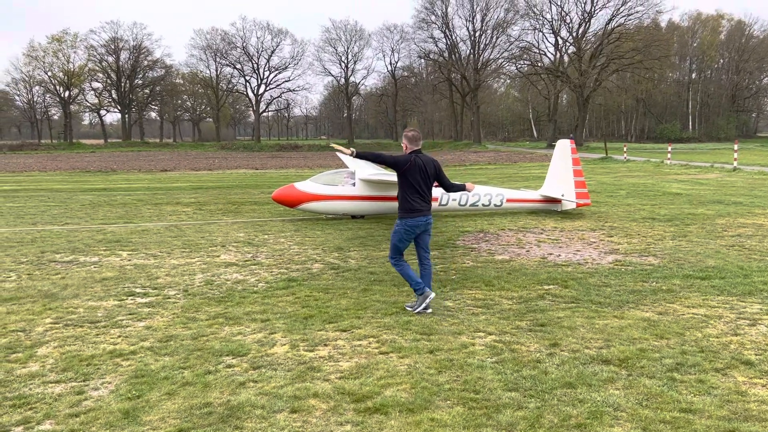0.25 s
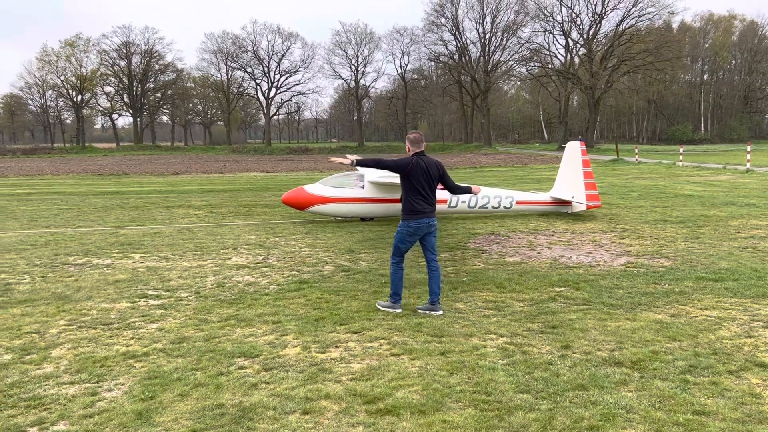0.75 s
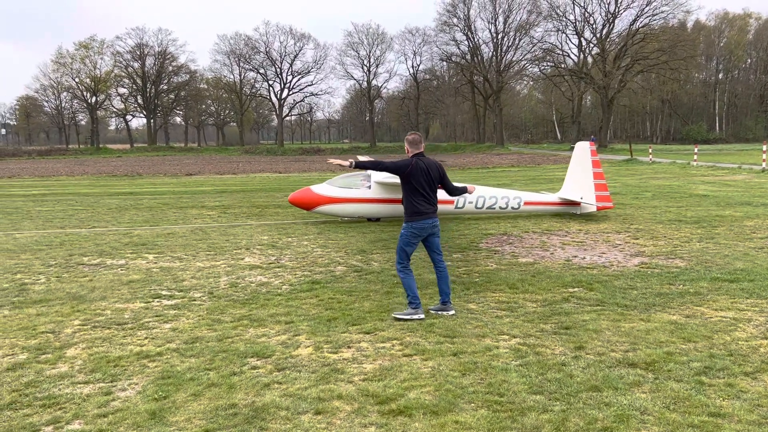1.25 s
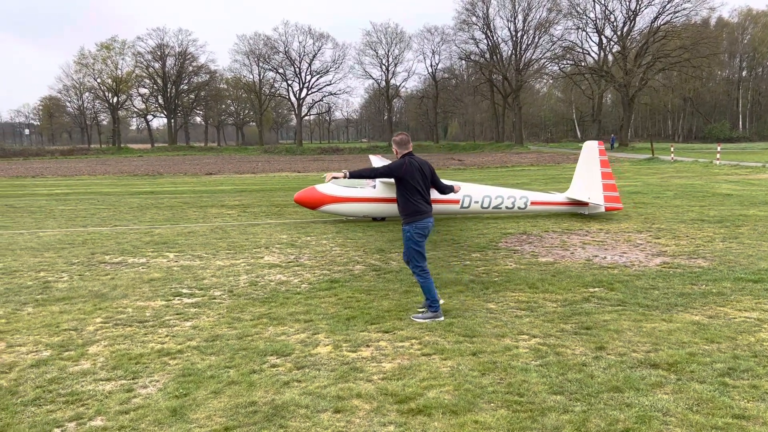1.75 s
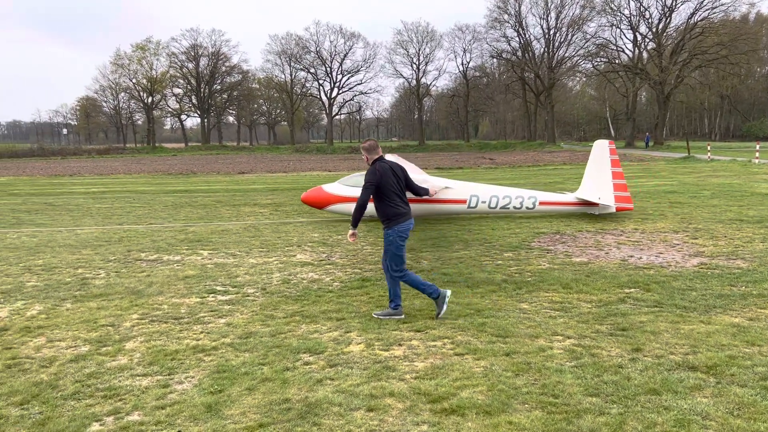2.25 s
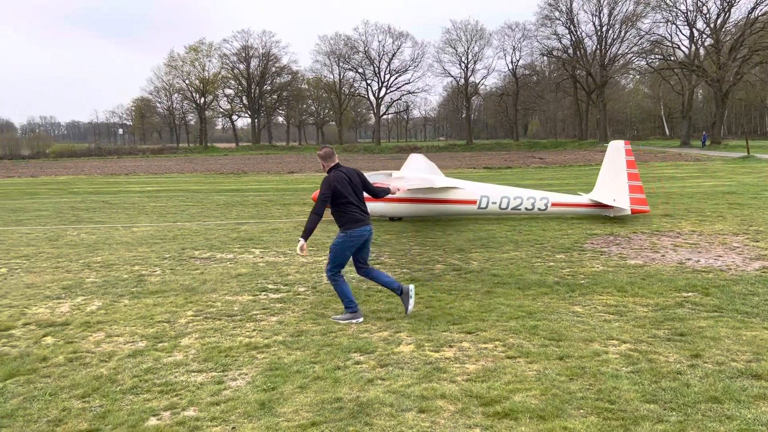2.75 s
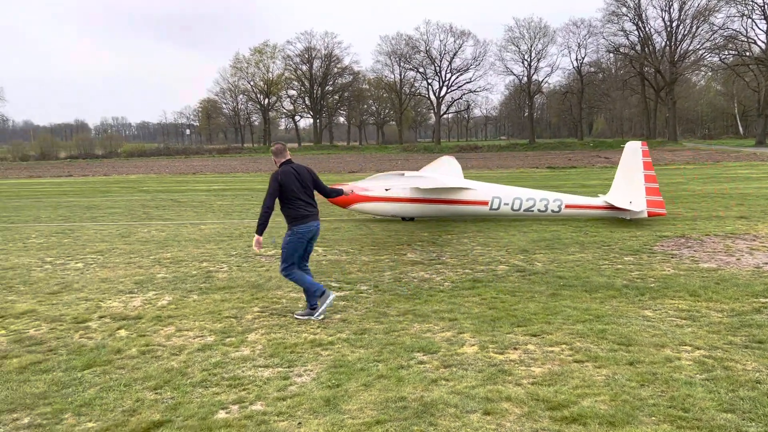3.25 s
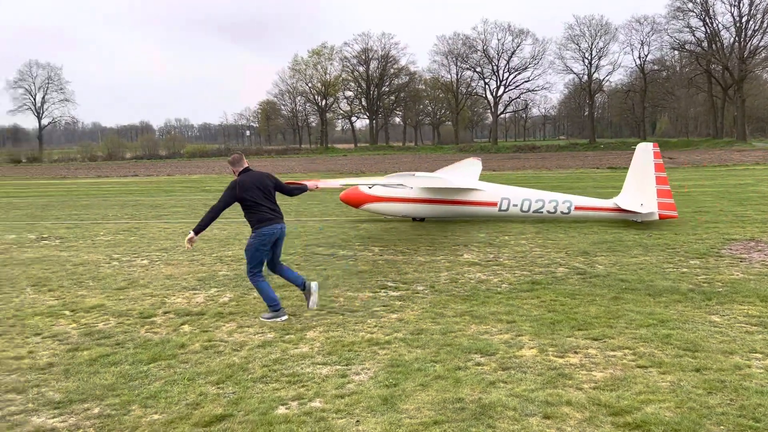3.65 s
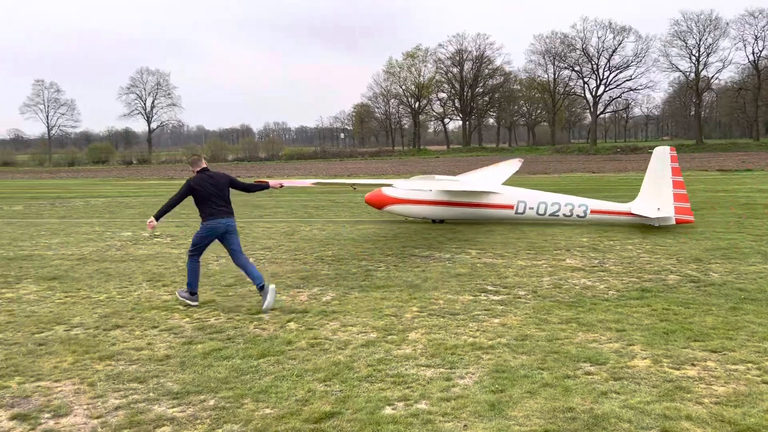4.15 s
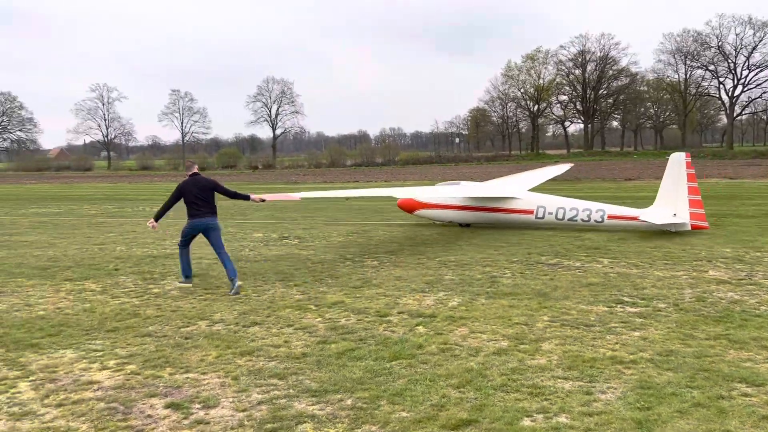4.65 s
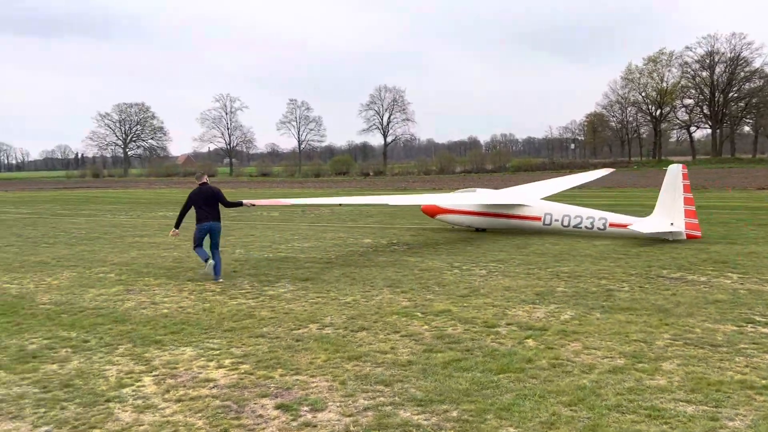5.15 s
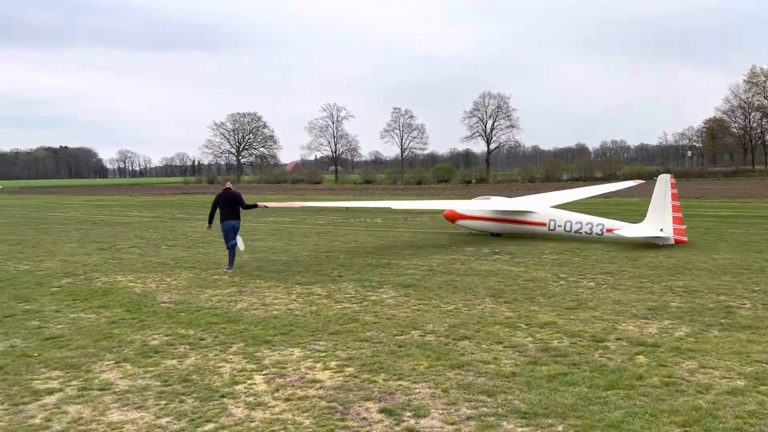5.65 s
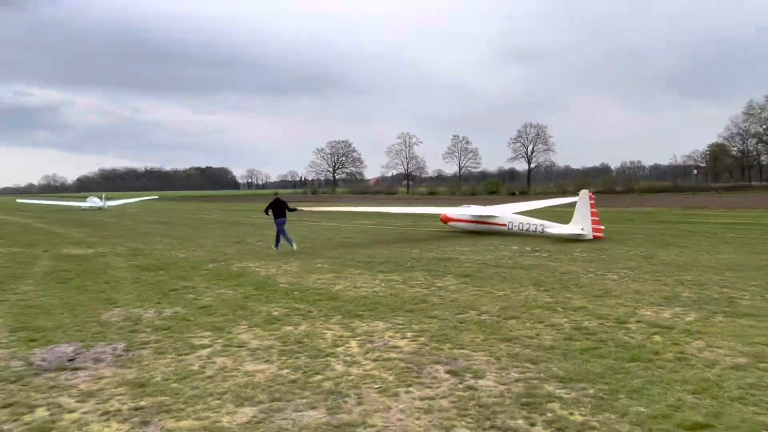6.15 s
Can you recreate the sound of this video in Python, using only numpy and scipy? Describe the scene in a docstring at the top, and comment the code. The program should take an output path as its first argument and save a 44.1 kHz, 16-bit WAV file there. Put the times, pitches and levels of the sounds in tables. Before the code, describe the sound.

A hand-held phone outdoors picks up a small propeller plane, left of centre, opening to full power. Rough separate blade beats and sharp snaps merge into a smooth low buzz with airy rasp and a geared engine humming beside it. The pitch stays level and the upper buzz slowly thins as the plane rolls away, while wind rumble grows into heavy low buffeting with faint ticks near the end.

```python
"""Tow plane taking off

A light tow plane, off to the left on a grass airfield, runs up to full power and rolls away.
Its two-blade propeller drones in steady tones and rasps with hiss chopped once a blade; short cracks,
one a blade, mark the low speeds. The geared four-cylinder engine hums beside it as a row of sines.
Gusts rumble as low noise on the ports of a hand-held phone, with surges of low tone, knocks and ticks."""
import sys
import numpy as np
from scipy import signal
from scipy.fft import rfft, irfft, next_fast_len
from scipy.io import wavfile
from scipy.ndimage import uniform_filter1d

SR = 44100
rng = np.random.default_rng(int(sys.argv[2]) if len(sys.argv) > 2 else 0)


def bounce(signal):
    """Save signal as a 16-bit WAV file at the path given by the first command-line argument."""
    frames = np.transpose(np.atleast_2d(signal))
    limited = np.clip(frames, -1, 1)
    pcm = np.round(limited * 32767).astype(np.int16)
    wavfile.write(sys.argv[1], SR, pcm)


N = 281710
SIZE = next_fast_len(N)
BINS = np.arange(SIZE // 2 + 1) * SR / SIZE  # Hz
TIME = np.arange(N) / SR  # seconds
PASSAGES = N // 400  # more random draws than there are blade passages


def undb(db):
    """Gain of a level in dB."""
    return 10 ** (np.asarray(db) / 20)


def unit(x):
    """Scaled to rms 1."""
    return x / np.sqrt(np.mean(x ** 2))


def curves(table):
    """Every column of a table after the first, drawn as straight lines between its times."""
    s, *columns = np.transpose(table)
    return [np.interp(TIME, s, column) for column in columns]


def across(table, hz):
    """A spectrum read on a logarithmic frequency axis."""
    f, value = np.transpose(table)
    return np.interp(np.log(hz + 1), np.log(f), value)


def bell_gain(bins, hz, octaves):
    """Bell-shaped filter on a logarithmic frequency axis."""
    return np.exp(-(np.log2((bins + 1) / hz) / octaves) ** 2)


def band(x, hz, octaves):
    """Sound filtered to one bell-shaped band."""
    return irfft(rfft(x, SIZE) * bell_gain(BINS, hz, octaves), SIZE)[..., :N]


def bell(s, length):
    """A smooth rise and fall in time about s."""
    return np.exp(-((TIME - s) / length) ** 2)


def walk(rate):
    """Random levels held 1 / rate seconds and smoothed twice; spread near 1."""
    k = int(SR / rate)
    steps = np.repeat(rng.standard_normal(N // k + 1), k)
    return 1.3 * uniform_filter1d(uniform_filter1d(steps, k), k)[:N]


def tone(turns, phase, flutter_db, wander):
    """A sine of rms near 1 whose level and phase are stirred by the air it crosses."""
    level = np.sqrt(2) * undb(flutter_db * walk(14))
    return level * np.cos(2 * np.pi * turns + phase + wander * walk(14))


def bursts(rows, octaves, t60, snap):
    """A sharp snap with a short noise tail that falls 60 dB in t60 seconds, each in its own band."""
    rise_s = .002
    out, size = np.zeros(N + SR), 8192
    age, bins = np.arange(size) / SR, np.arange(size // 2 + 1) * SR / size
    for s, db, hz in rows:
        tail = np.exp(-np.log(1000) * age / t60) * np.clip(age / rise_s, 0, 1)
        push = rng.standard_normal(size) * tail
        push[int(rise_s * SR)] += snap
        burst = irfft(rfft(push) * bell_gain(bins, hz, octaves), size)
        burst = undb(db) * burst / np.abs(burst).max()
        # the end is left out, where the filter wraps round
        out[int(s * SR):int(s * SR) + size] += burst * (age < .9 * age[-1])
    return out[:N]


CRACKLE_FADES_HZ = 62.8  # blade rate at which low-speed roughness and weak cracks end
IDLE_ROUGH = .4  # extra flutter of the low tones at the lowest speed, as a share
# upper overtones: base level at first and at full power, rise from and to, hold until, then fade
BUZZ_IDLE_DB, BUZZ_FULL_DB, BUZZ_RISE_S = -76, -57.5, (1.07, 2.9)
BUZZ_HOLDS_TO_S, BUZZ_FADE_DB_PER_S = 3.3, 1.5
BUZZ_PATCHY_DB = 1.3  # each overtone comes and goes
# The upper overtones' colour. Each row: frequency in Hz, level in dB over the base level.
UPPER_COLOUR = [(300, 19.5), (380, 11.5), (480, -4), (570, 1), (700, -1), (950, 2.5), (1150, 5), (1350, -2),
                (1700, -5.5), (2200, -12)]
# Single overtones that stand out for a while.
# Each row: multiple of the blade rate, middle in seconds, length in seconds, rise in dB.
STANDOUTS = [(6, 1.05, .3, 10.5), (7, .5, 0.13, 7), (9, 2.88, 0.088, 10.5), (13, 3.05, .2, 3),
             (18, 3.05, 0.11, 11.5), (12, 4.3, .15, 6.5), (6, 4.2, 0.23, 8.5), (7, 3.67, 0.11, 7),
             (8, 4.25, 0.18, 3), (8, 2.679, 0.22, 4.5), (9, 4.3, 0.068, 11), (9, 4.75, 0.073, 7.5),
             (10, 5, 0.066, 12), (11, 4.35, 0.11, 10), (12, 3.346, 0.093, 11.5), (13, 4.1, .25, 9.5),
             (15, 6.1, .2, 3), (17, 3.2, .08, 4), (18, 4, 0.11, 5.5)]
# Level change of the steady low drone from the gust on, where the surges carry much of its pitch.
# Each row: time in seconds, change in dB.
DRONE_LEVEL = [(5.38, 0.5), (5.43, -12), (5.73, -14), (6.06, -2.5), (6.14, -5), (6.2, -5.5), (6.236, -5.5),
               (6.26, -4.5)]


def propeller(blade_hz, turns, levels_db):
    """Low tones in step, one pressure pulse a blade, and weaker overtones that fade with distance."""
    rough = 1 + IDLE_ROUGH * np.interp(blade_hz, (blade_hz.min(), CRACKLE_FADES_HZ), (1, 0))
    low = 0
    for order, db in enumerate(levels_db, 1):
        low = low + undb(db) * tone(order * turns, 0.25, .9 * rough, 0.22 * rough)
    upper = 0
    for order in range(6, 27):
        db = across(UPPER_COLOUR, order * blade_hz) + BUZZ_PATCHY_DB * walk(7)
        for standout_order, s, length, rise_db in STANDOUTS:
            if standout_order == order:
                db = db + rise_db * bell(s, length)
        upper = upper + undb(db) * tone(order * turns, 2 * np.pi * rng.random(), 1.5, .3)
    buzz_db = np.interp(TIME, BUZZ_RISE_S, (BUZZ_IDLE_DB, BUZZ_FULL_DB))
    buzz_db = buzz_db - BUZZ_FADE_DB_PER_S * np.clip(TIME - BUZZ_HOLDS_TO_S, 0, None)
    return undb(curves(DRONE_LEVEL)[0]) * low + undb(buzz_db) * upper


RASP_DB_PER_OCTAVE = 2  # the lowest rasp rises with blade rate
CHOP_FULL, CHOP_IDLE = 0.34, 0.52  # chop depth 0-1 at the highest and lowest blade rate
SWELL_OCTAVES = 0.15  # width of a hiss swell
# How the rasp rises and falls; only the changes about each column's average are heard.
# Each row: time in seconds, level in dB of the middle, of the lower treble, of the upper treble.
RASP_LEVELS = [(0.0, -57, -59.5, -64.5), (0.23, -59.5, -55.5, -60.5), (0.44, -45, -52.5, -62.5),
               (0.46, -56, -59.5, -62.5), (0.85, -50, -58.5, -63.5), (0.91, -55.5, -63, -65),
               (1.24, -49, -55.5, -60.5), (1.39, -49, -59, -55), (1.97, -49, -52.5, -56),
               (2.4, -45, -50.5, -50), (2.74, -47, -50, -52.5), (2.81, -46.5, -45.5, -48),
               (3.09, -49.5, -54, -56.5), (4.57, -52, -54.5, -58), (4.88, -52.5, -52, -55),
               (5.05, -56, -54, -57), (6.37, -48, -56.5, -55.5), (6.39, -46, -53.5, -46.5)]
# Where the four level curves act: centres in Hz for the speed-driven low rasp, then those three levels.
RASP_HZ = [800, 1650, 2900, 4600]
# The rasp's colour. Each row: frequency in Hz, level in dB relative to the other rows.
RASP_COLOUR = [(250, 12), (450, -2), (700, -4), (1000, -1), (1400, 1.5), (1700, -1.5), (2100, -4),
               (2400, -5.5), (2800, -4), (3150, -5.5), (3500, -11), (4400, -16), (5300, -12), (6200, -16),
               (7300, -20), (8500, -20.5), (11600, -30.5), (15000, -36)]
# Brief swells of hiss. Each row: middle in seconds, length in seconds, centre in Hz, rise in dB.
HISS_SWELLS = [(0.747, 0.82, 1378, 8), (0.107, 0.22, 4270, 8.5), (0.192, 0.035, 5980, 15.5),
               (0.611, 0.58, 6040, 4.5), (0.958, 0.068, 6140, 11), (1.41, 0.13, 6300, 15.5),
               (1.486, 0.04, 4390, 7.5), (2.134, 0.031, 5400, 7.5), (2.312, 0.047, 2780, 7.5),
               (2.471, 0.087, 2880, 10.5), (2.751, 0.16, 1740, 3), (2.834, 0.054, 2830, 5.5),
               (3.875, 0.11, 4510, 12), (5.202, 0.4, 4150, 3.5), (5.392, 0.096, 3120, 1.5),
               (5.199, 0.5, 3600, 5.5), (5.696, 0.13, 4700, 8.5), (6.054, 0.17, 1800, 4.5),
               (6.062, 0.16, 2365, 5), (4.776, .1, 2260, 5), (4.853, 0.18, 3160, 1),
               (6.206, 0.19, 4540, 11)]
# How alike the rasp is in the left and right channels.
# Each row: frequency in Hz, likeness from 0 to 1.
ALIKE = [(200, 0.77), (500, 0.096), (800, 0.087), (1200, 0.48), (2800, 0.69), (3900, 0.14), (4600, 0.82),
         (5200, 0.27), (6300, 0.47), (8800, 0.92), (9200, 1), (15000, 1)]


def rasp(blade_hz, turns):
    """Turbulent hiss, chopped by each blade and patchy from band to band; a shared and an unshared part."""
    passage = turns.astype(int)
    levels_db = [RASP_DB_PER_OCTAVE * np.log2(blade_hz), *curves(RASP_LEVELS)]
    swing_db = np.array([db - db.mean() for db in levels_db])
    depth = np.interp(blade_hz, (blade_hz.min(), blade_hz.max()), (CHOP_IDLE, CHOP_FULL))
    common_db = rng.standard_normal(PASSAGES)[passage]
    flicker_db = walk(9)  # the treble flickers as a whole
    out = 0
    for hz in 260 * 2 ** np.arange(0, 6, 1 / 4):
        # no two blade passages alike; the treble is chopped less
        own_db = np.clip(rng.standard_normal(PASSAGES), -2, 1.5)[passage]
        size = undb(1.5 * common_db + 5.0 * own_db)
        puff = 0.63 * size * np.sin(np.pi * (turns % 1) ** 0.87) ** 4
        chopped = np.clip(depth * min(1., (2500 / hz) ** 0.091), 0, 1)
        swell_db = 0
        for s, length, f, db in HISS_SWELLS:
            swell_db = swell_db + db * bell(s, length) * np.exp(-(np.log2(hz / f) / SWELL_OCTAVES) ** 2)
        # blend the two nearest level curves
        place = np.interp(np.log(hz), np.log(RASP_HZ), np.arange(len(RASP_HZ)))
        weight = np.clip(1 - np.abs(place - np.arange(len(RASP_HZ))), 0, 1)
        patchy_db = 2.12 * walk(8) + 0.73 * min(hz / 4000, 1) * flicker_db
        level_db = across(RASP_COLOUR, hz) + weight @ swing_db + swell_db + patchy_db
        noise = band(rng.standard_normal((2, N)) * (1 - chopped + chopped * puff), hz, .17)
        alike = np.clip(across(ALIKE, hz), 0, 1)
        out = out + undb(level_db) * noise * np.sqrt([[1 + alike], [1 - alike]])
    return undb(-46.5) * unit(out)


CRACKLE_DB, CRACKLE_SCATTER_DB = -39, 1.5  # peak level of the weak cracks before the ports
CRACK_HZ, CRACK_SPREAD = 1390, .1  # centre, and its random spread as a share
# Blade cracks placed one by one, mostly louder than the rest.
# Each row: start in seconds, peak level in dB before the ports.
PLACED_CRACKS = [(0.038, -34.5), (0.0878, -31.5), (0.252, -33.5), (.343, -31), (0.4045, -28.5),
                 (0.4282, -26.5), (0.486, -36.5), (0.692, -33), (0.7275, -34.5), (0.7674, -31),
                 (.848, -33.5), (.996, -32.5), (1.0331, -32.5), (1.051, -34.5), (1.113, -28.5),
                 (1.2404, -39.5), (1.259, -37), (1.365, -34), (1.428, -27)]


def cracks(blade_hz, turns):
    """At low speed each blade cracks: short snaps of noise, the placed ones mostly louder than the rest."""
    at = np.flatnonzero(np.diff(turns.astype(int)))
    at = at[blade_hz[at] < CRACKLE_FADES_HZ]
    # no weak crack within half a passage of a placed one
    gap_s = np.abs(at[:, None] / SR - np.transpose(PLACED_CRACKS)[0]).min(axis=1)
    at = at[gap_s > .5 / blade_hz[at]]
    weak = zip(at / SR, CRACKLE_DB + CRACKLE_SCATTER_DB * rng.standard_normal(PASSAGES))
    rows = list(PLACED_CRACKS) + list(weak)
    centres = CRACK_HZ * (1 + CRACK_SPREAD * rng.standard_normal(PASSAGES))
    return bursts([(s, db, hz) for (s, db), hz in zip(rows, centres)], 0.7, 0.035, 7.)


RING_HZ, RING_DB = 1597, -61.5  # centre; base gain outside the swell
RING_SWELL_DB, RING_SWELL_S, RING_LENGTH_S = 19, 2.4, 0.16  # rise, middle, half length
RING_HISS = .7  # hiss added to each unit of strike


def ring(turns):
    """Each blade passage strikes a narrow resonance anew; its swell holds before it falls."""
    passage = turns.astype(int)
    size = undb(1.5 * rng.standard_normal(PASSAGES))[passage]
    strike = unit(band(np.diff(passage, prepend=0) * size, RING_HZ, 0.13))
    hiss = unit(band(rng.standard_normal(N), RING_HZ, 0.056))
    swell = np.exp(-((TIME - RING_SWELL_S) / RING_LENGTH_S) ** 4)
    return undb(RING_DB + RING_SWELL_DB * swell) * (strike + RING_HISS * hiss)


GEAR_FIRINGS = 2.267  # firings per blade passage
# The engine's tones. Each row: multiple of the firing rate, level in dB before the throttle curve.
EXHAUST = [(.25, -49.5), (.5, -60.5), (.75, -54), (1, -38), (1.5, -60.5), (2, -58.5), (3, -74.5)]
# The throttle curve. Each row: time in seconds, change of exhaust level in dB.
THROTTLE = [(0, -28), (.8, -20.5), (1.5, 5.5), (2.2, 1), (3, -4.5), (4, -8.5), (5, -6), (6.39, -16)]


def engine(turns):
    """Firing tone with its overtones and the sub-tones of unequal cylinders, geared to the propeller."""
    hum = sum(undb(db) * tone(GEAR_FIRINGS * order * turns, 0, 5.2, 0.55) for order, db in EXHAUST)
    return undb(curves(THROTTLE)[0]) * hum


# Phase between left and right channel. Each row: frequency in Hz, radians by which the left leads.
PHASE_LEAD = [(0, 0.06), (1550, 4.4), (1810, 6.79), (2410, 6.38), (3360, 8.13), (4740, 6.65), (6290, 12.23),
              (6630, 11.9), (8180, 11.44), (9040, 9.6), (10900, 8.81), (11800, 5.92), (14000, 5.76),
              (14600, 2.52)]
# Balance of the two channels. Each row: frequency in Hz, left minus right in dB.
TILT = [(120, -0.1), (300, 2.3), (650, -0.5), (1000, 4.5), (1400, -7.5), (1750, 5.5), (2400, 2.5),
        (3100, 1), (4200, 6.5), (5300, 0), (6900, 1.5), (7600, 1), (9000, 0.5)]


def ports(both, apart):
    """The plane is off to the left: the left channel leads in phase, and the two differ in colour."""
    hz, lead = np.transpose(PHASE_LEAD)
    turn = np.exp(.5j * np.interp(BINS, hz, lead)) * undb(across(TILT, BINS) / 2)
    left = rfft(both + apart, SIZE) * turn
    right = rfft(both - apart, SIZE) / turn
    return irfft([left, right], SIZE)[:, :N]


# Wind on the ports.
# Each row: time in seconds, rumble level in dB, level in dB of the upper part over the rumble.
WIND = [(0, -44.5, 4.5), (.4, -39, 0), (1.0, -32.5, -6), (1.35, -34, -5), (1.7, -35, 1.5), (2.2, -41, 1.5),
        (2.8, -41, 7.5), (3.2, -33, -10.5), (3.8, -32, -6), (4.5, -35, -12), (4.8, -34.5, -7.5),
        (5.1, -30, -11), (5.35, -30.5, -11), (5.5, -28.5, -4), (5.9, -25.5, -3.5), (6.15, -30, -5),
        (6.39, -28, -4)]


def wind():
    """Turbulent air rumbles in lumps under the surges; part is shared, part opposite at the two ports."""
    rumble_db, upper_db = curves(WIND)
    low = unit(band(rng.standard_normal((2, N)), 69.0, 0.74))
    upper = unit(band(rng.standard_normal((2, N)), 148.0, 0.65))
    lumps_db = 2.0 * np.tanh(walk(13))
    both, apart = undb(rumble_db + lumps_db) * (low + undb(upper_db) * upper)
    return both + surges() + 0.77 * band(apart, 120., 1.8) * np.array([[1], [-1]])


PUFF_DB = -34  # noise on top of a surge, relative to its tone
# Short surges of low tone, mostly near the drone's pitch, as the gust breaks it up.
# Each row: start in seconds, length in seconds, peak level in dB, frequency in Hz.
SURGES = [(5.419, 0.04, -11.5, 82), (5.468, 0.044, -10.5, 78.3), (5.517, 0.047, -14, 95.4),
          (5.561, .04, -26.5, 78), (5.602, 0.031, -9.5, 92.6), (5.637, 0.024, -9.5, 86),
          (5.678, 0.041, -14.5, 81.06), (5.721, 0.026, -23, 79.4), (5.748, 0.049, -13.5, 69.7),
          (5.805, 0.061, -13.5, 80), (5.88, 0.026, -12.5, 85), (5.904, 0.032, -11.5, 87.47),
          (5.938, 0.032, -20, 97), (5.97, 0.023, -11, 81), (5.992, 0.031, -15, 94),
          (6.022, 0.032, -16, 138.6), (6.072, 0.038, -13, 77.6), (6.16, .045, -18.5, 79.4),
          (6.232, 0.047, -17, 81)]


def surges():
    """Each a short swell of low tone with a puff of noise on top, as the gust breaks up the drone."""
    out, air = np.zeros(N), unit(band(rng.standard_normal(N), 380, 1.05))
    for s, length, db, hz in SURGES:
        age = TIME - s
        swell = np.sin(np.pi * np.clip(age / length, 0, 1))
        out += undb(db) * swell * (np.sin(2 * np.pi * hz * age) + undb(PUFF_DB) * air)
    return out


# Dull knocks close to the phone that rattle away, then low ticks of wind in the gust.
# Each row: start in seconds, peak level in dB, centre in Hz.
KNOCKS_AND_TICKS = [(1.517, -32, 690), (1.535, -37, 560), (1.552, -36, 519.5), (1.572, -36, 420),
                    (1.595, -41, 398), (1.645, -44, 420), (5.488, -42, 680), (5.62, -41, 476),
                    (5.95, -43, 600), (6.07, -39, 520), (6.262, -42, 570)]


def knocks_and_ticks():
    """Short bursts of low-pitched noise, the same at both ports."""
    return bursts(KNOCKS_AND_TICKS, .8, .09, 3.)


# The propeller's speed and its drone.
# Each row: time in seconds, blade rate in Hz, then the levels of the first five tones in dB.
PROPELLER = [(0, 41.86, -57, -39, -52, -41.5, -56), (.2, 44.58, -53, -34.5, -43, -40, -50),
             (.32, 46.6, -49, -35, -36.5, -41.5, -54), (.46, 48.65, -45, -33.5, -37.5, -40.5, -49),
             (.65, 50.46, -49, -35, -42, -35, -51), (.76, 51.7, -55, -28.5, -30, -45, -38),
             (.98, 53, -49, -33, -34, -38, -49.5), (1.08, 53.52, -46, -31, -35.5, -39.5, -42.5),
             (1.17, 54.2, -35.5, -31, -33, -39.5, -49), (1.24, 55.03, -33, -30.5, -31.5, -40, -42),
             (1.34, 57.13, -28.5, -29, -31.5, -59, -52), (1.48, 62.84, -25.5, -28, -26, -51, -43.5),
             (1.63, 67.6, -27.5, -23, -28, -36, -59), (1.74, 71.27, -23.5, -27.5, -25.5, -39.5, -61),
             (2.06, 78, -28, -20.5, -30, -46, -59), (2.13, 78.1, -29.5, -21, -26.5, -50, -55.5),
             (2.59, 80.77, -30, -25, -39.5, -51.5, -64), (2.78, 81.24, -28.5, -25.5, -34.5, -48, -61),
             (3.13, 81.3, -31, -23, -34, -41, -56), (3.32, 81.4, -26, -21.5, -32, -43.5, -58),
             (3.68, 81.23, -23.5, -21, -39.5, -57.5, -63), (3.98, 81.2, -24.5, -25.5, -35.5, -52, -70.5),
             (4.18, 81.24, -23, -45, -52, -57, -55), (4.24, 81.16, -25.5, -46, -42.5, -60, -70),
             (4.28, 81.2, -25, -34, -42.5, -53, -63), (4.46, 81.4, -24, -28, -42, -69, -58),
             (4.53, 80.9, -25.5, -26.5, -48.5, -48.5, -67), (4.7, 81.2, -23, -28, -48.5, -56, -63),
             (4.77, 81.45, -21.5, -29.5, -59, -51, -55), (4.92, 80.9, -22.5, -35.5, -45, -59.5, -63.5),
             (5.1, 81.1, -18.5, -29.5, -36, -61, -60), (5.22, 81.06, -19.5, -31, -36.5, -46.5, -60),
             (5.35, 80.9, -20, -34.5, -51, -57, -52), (5.38, 81, -22.5, -40, -53, -57, -58.5),
             (5.8, 81.2, -19, -28, -44, -53, -61), (6.15, 81.15, -18.5, -29, -54, -55, -57),
             (6.39, 81.1, -18.5, -30, -46, -54, -64)]


def scene():
    """Plane through the air to the ports; wind, knocks and ticks directly on them."""
    blade_hz, *levels_db = curves(PROPELLER)
    turns = np.cumsum(blade_hz) / SR  # blade passages so far
    both, apart = rasp(blade_hz, turns)
    both = both + propeller(blade_hz, turns, levels_db) + cracks(blade_hz, turns)
    both = both + ring(turns) + engine(turns)
    return ports(both, apart) + wind() + knocks_and_ticks()


def record(dry):
    """The phone cuts the deepest bass, rounds the loudest peaks and cuts the top above 15100 Hz."""
    body = signal.sosfilt(signal.butter(2, 35, "high", fs=SR, output="sos"), dry)
    body = .7 * np.tanh(body / .7)
    return signal.sosfilt(signal.ellip(8, .2, 70, 15100, fs=SR, output="sos"), body)


dry = scene()
out = record(dry)
bounce(out)
```